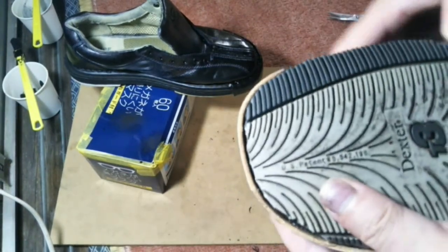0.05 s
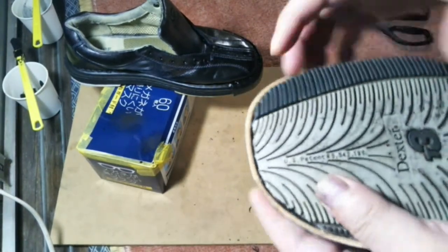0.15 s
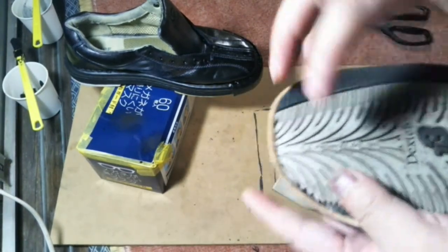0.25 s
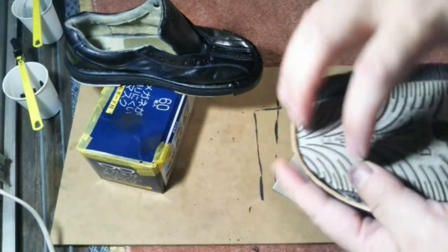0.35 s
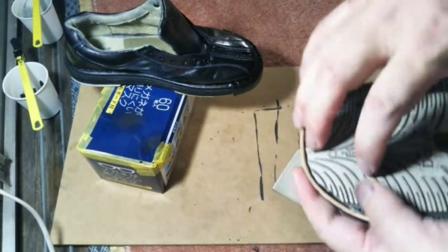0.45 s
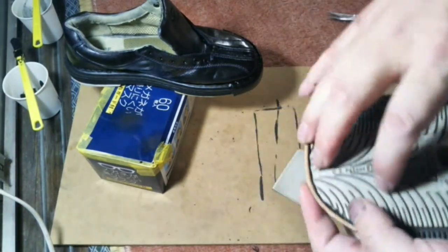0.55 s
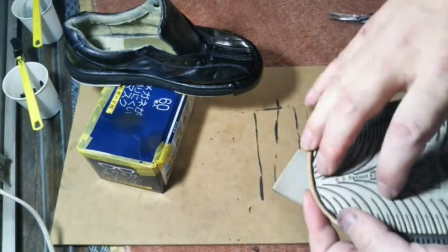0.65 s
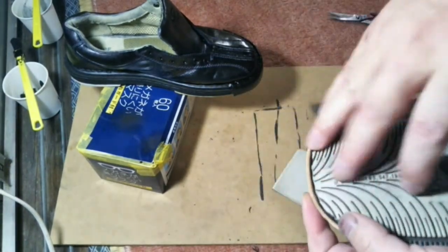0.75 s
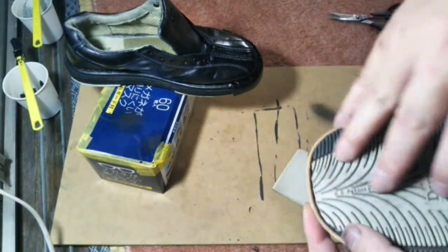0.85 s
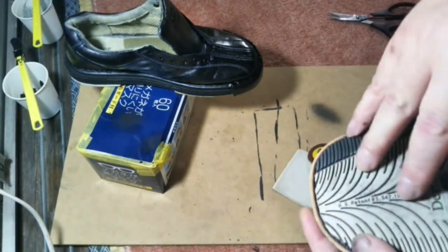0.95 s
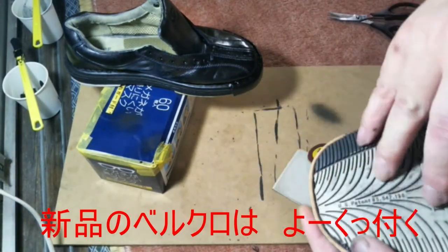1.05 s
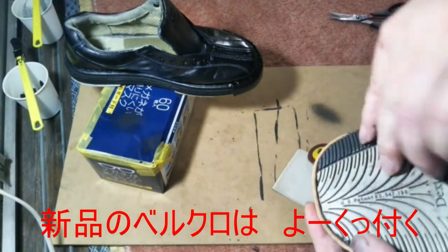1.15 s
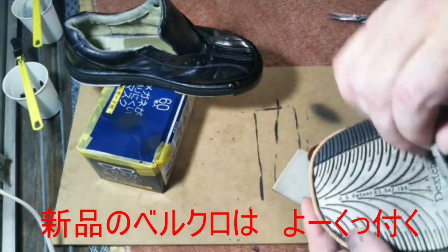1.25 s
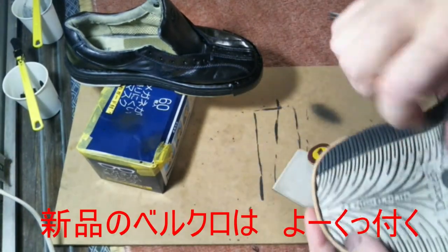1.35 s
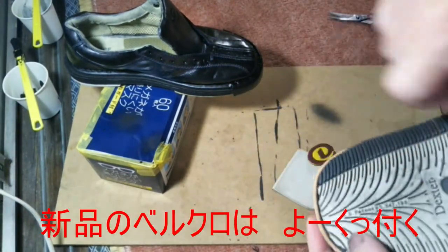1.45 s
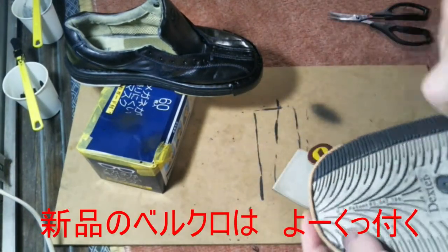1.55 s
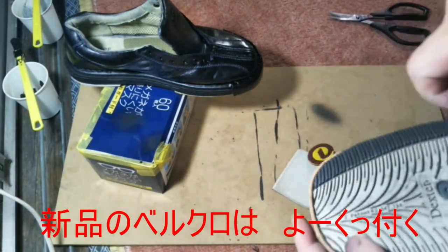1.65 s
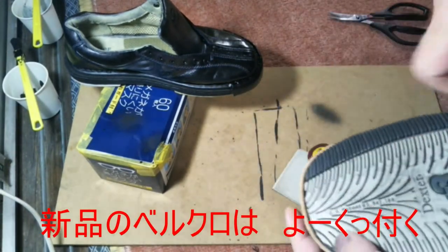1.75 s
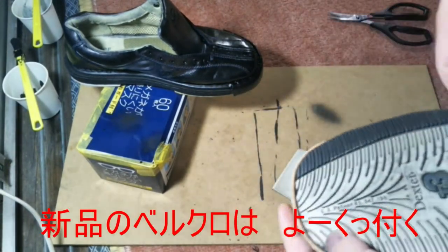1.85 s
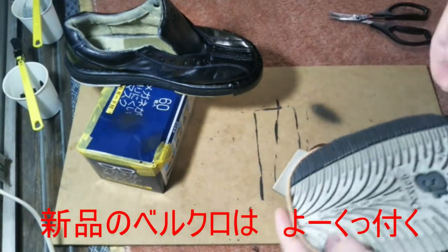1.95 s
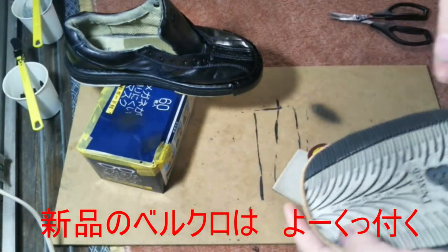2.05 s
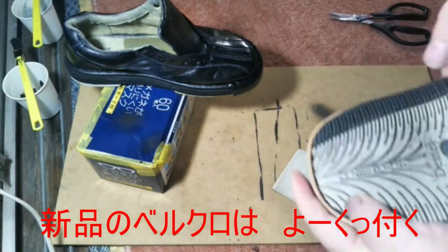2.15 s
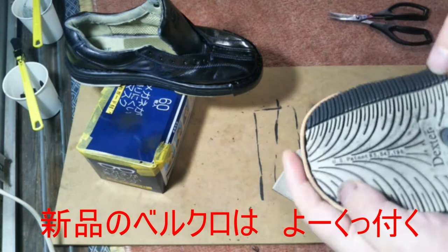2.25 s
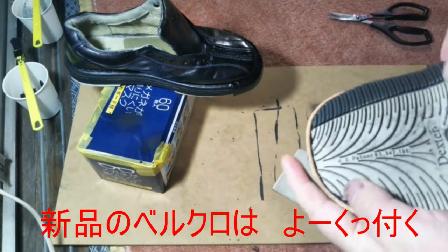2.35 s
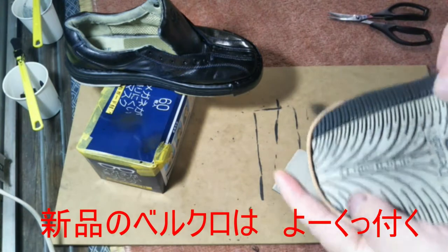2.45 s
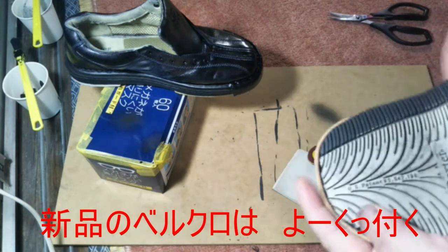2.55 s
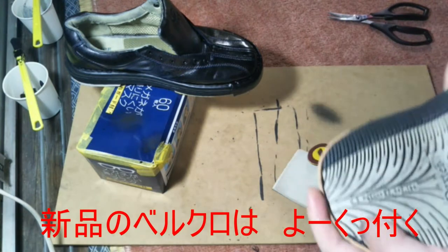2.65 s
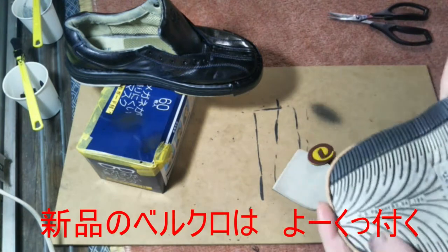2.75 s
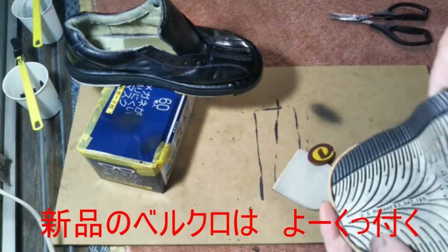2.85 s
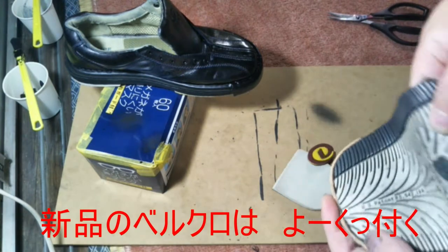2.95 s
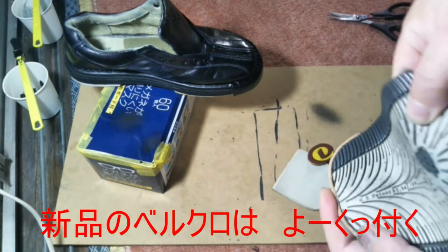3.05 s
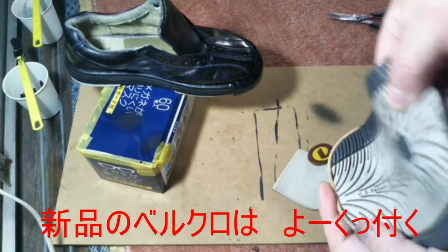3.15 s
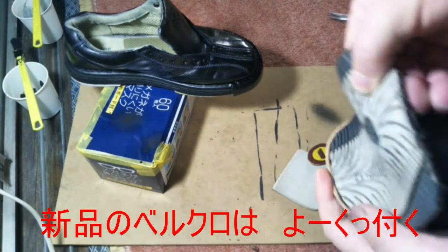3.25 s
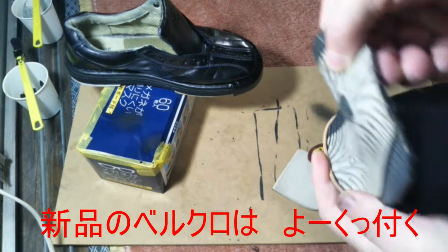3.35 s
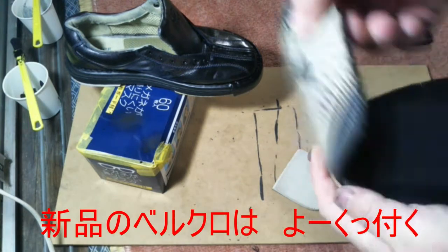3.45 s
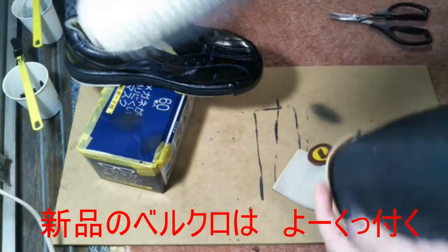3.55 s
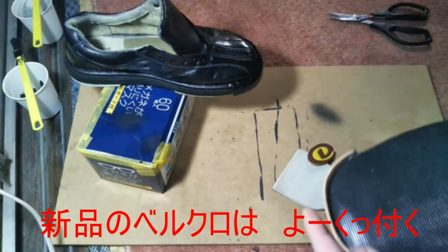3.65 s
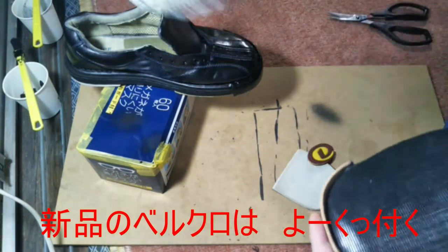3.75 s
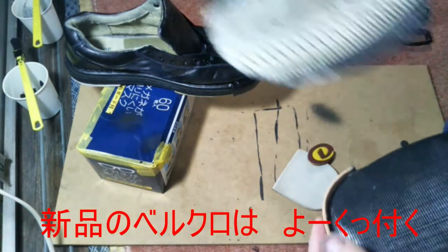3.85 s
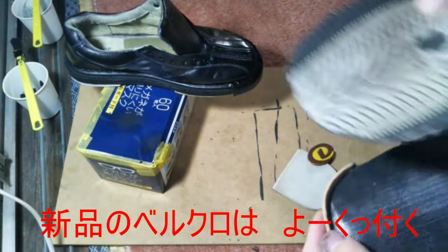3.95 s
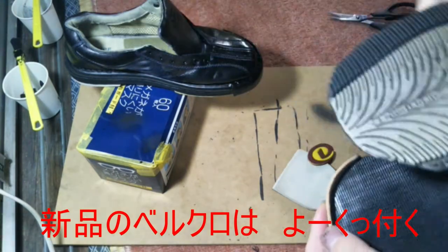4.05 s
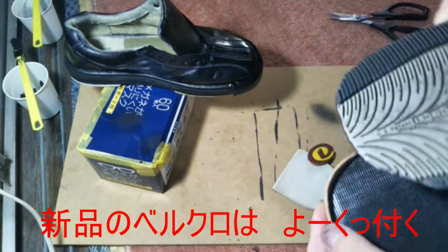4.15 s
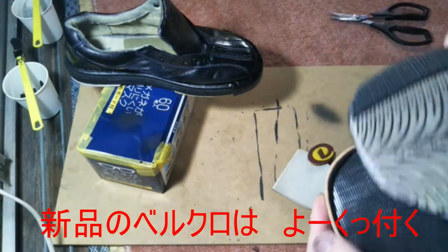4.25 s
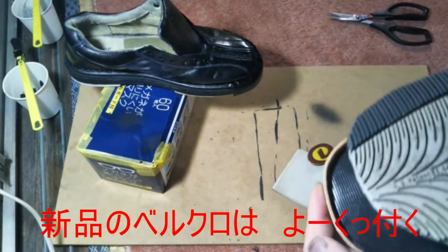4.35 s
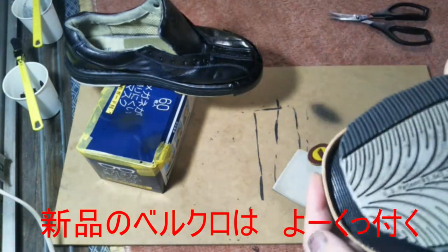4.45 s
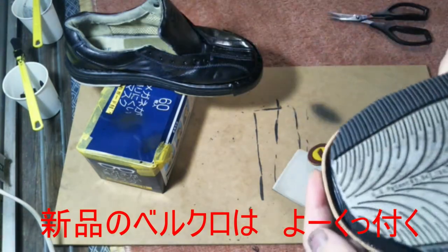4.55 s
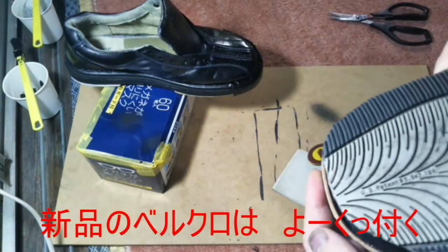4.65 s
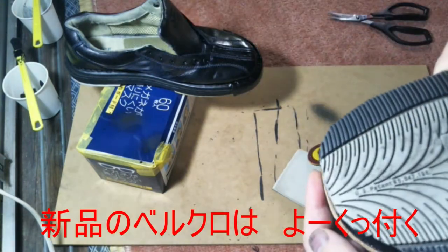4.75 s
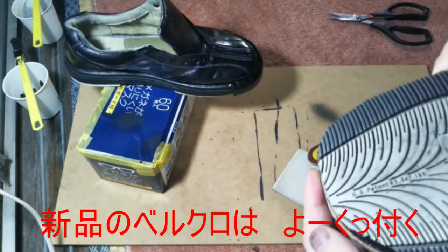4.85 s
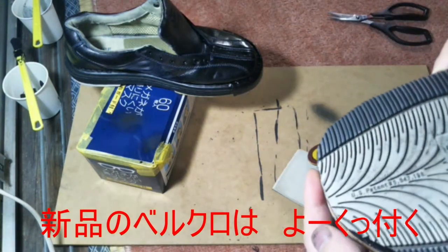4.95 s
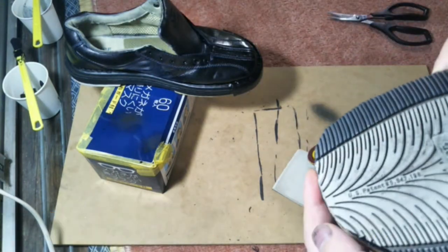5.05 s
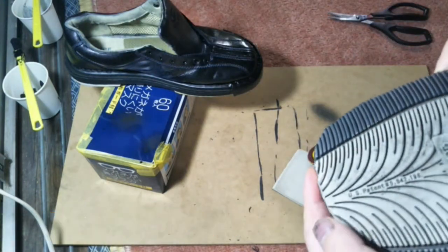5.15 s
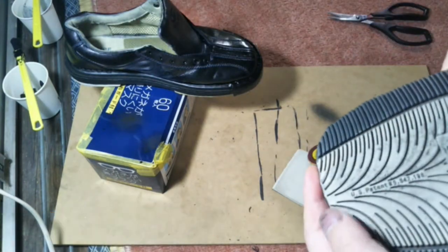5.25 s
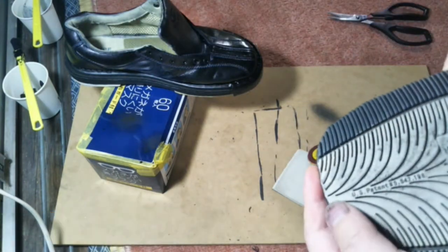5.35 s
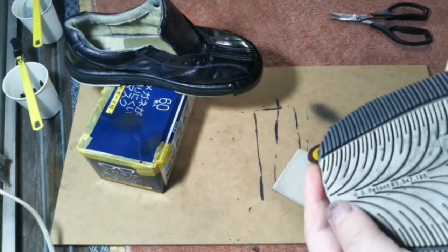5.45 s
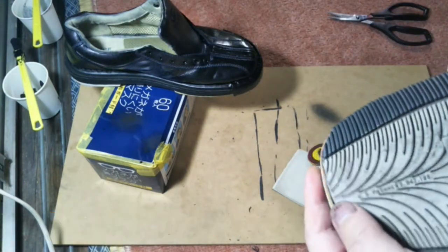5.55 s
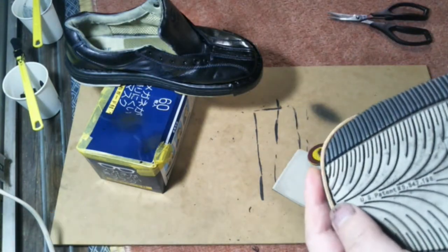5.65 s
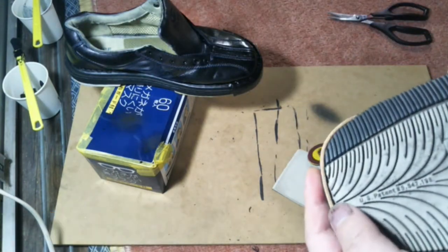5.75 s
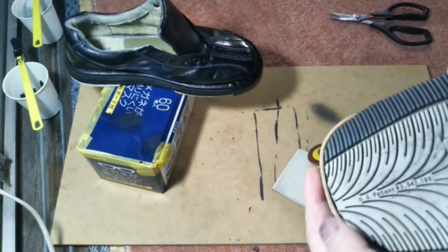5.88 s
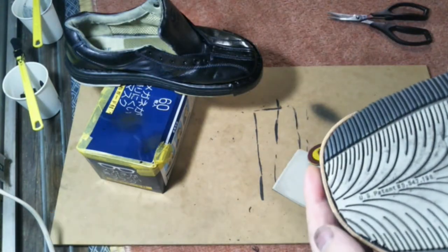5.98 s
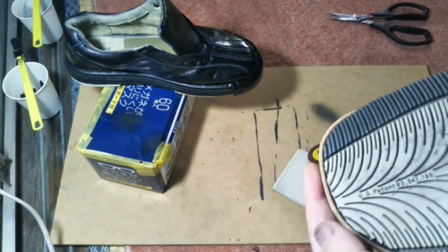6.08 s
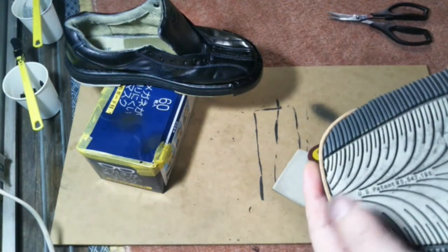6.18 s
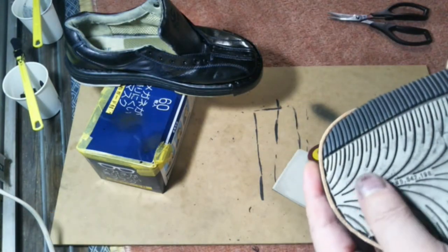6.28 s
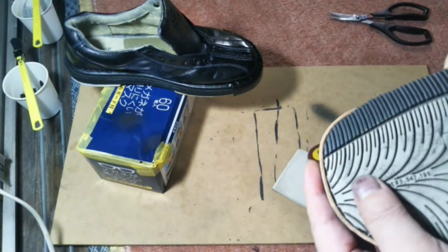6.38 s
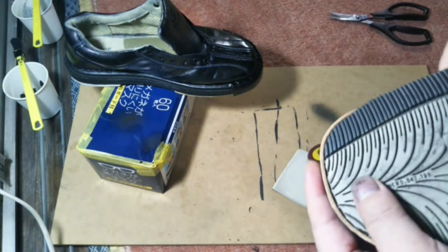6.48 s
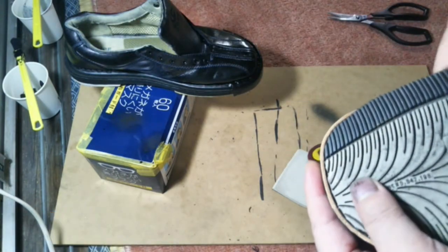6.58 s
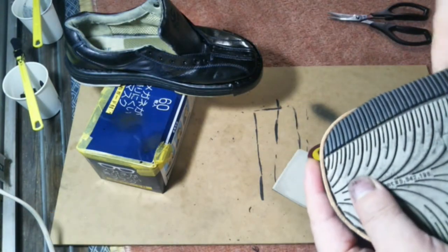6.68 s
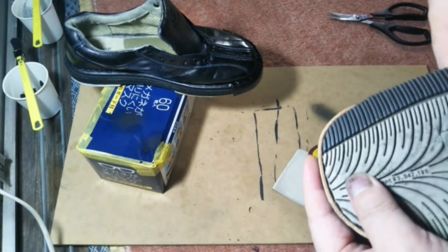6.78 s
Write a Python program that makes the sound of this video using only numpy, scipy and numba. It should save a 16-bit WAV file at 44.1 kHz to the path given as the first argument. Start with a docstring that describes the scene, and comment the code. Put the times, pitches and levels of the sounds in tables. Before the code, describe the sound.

Hook-and-loop fastener rips apart up close in long pulls and stuttering tugs, with soft finger rubs and a faint distant cricket.

```python
"""Hook-and-loop tape rips, stutters, then rips free as a replaceable sole is peeled off a shoe.
Every hook that lets go is a click that rings the rubber sole and the stiff backing, close over a workbench.
Fingers rub and tap on the shoe, and the tip of the sole scrapes as it is pressed back on.
Far off, behind the hum and hiss of a quiet room, a cricket chirps in runs of wing strokes."""
import sys
import numpy as np
from scipy import signal
from scipy.fft import rfft, irfft
from scipy.io import wavfile
from numba import njit

SR = 44100
rng = np.random.default_rng(int(sys.argv[2]) if len(sys.argv) > 2 else 0)


def output_pcm(signal):
    """Save a mono or channel-first signal as 16-bit PCM at the path in sys.argv[1].

    Samples are clipped to [-1, 1] before scaling.
    """
    pcm = np.clip(np.atleast_2d(signal).T, -1, 1) * 32767
    wavfile.write(sys.argv[1], SR, np.round(pcm).astype(np.int16))


N = 300762
TIME = np.arange(N) / SR


def from_db(db):
    return 10 ** (np.asarray(db) / 20)


def rms_one(x):
    return x / np.sqrt(np.mean(x ** 2) + 1e-20)


def energy_one(x):
    return x / np.sqrt(np.sum(x ** 2) + 1e-20)


def add(out, s, sound):
    """Mix a short sound in at time s."""
    start = max(round(s * SR), 0)
    out[..., start:start + sound.shape[-1]] += sound[..., :N - start]


def drift(rate):
    """A random wander of rms 1, with `rate` turning points a second."""
    knots = rng.standard_normal(8000)
    return rms_one(np.interp(TIME * rate, np.arange(len(knots)), knots))


def butter(x, hz, kind, order=2):
    return signal.sosfilt(signal.butter(order, hz, kind, fs=SR, output="sos"), x + 1e-18)


def convolve(x, response):
    return signal.fftconvolve(np.atleast_2d(x), np.atleast_2d(response), axes=-1)[:, :N]


def ring_of(spectrum, size=4096):
    """Minimum-phase ring of a tone colour, energy 1; its skirts fall 60 dB an octave."""
    hz, db = np.transpose(spectrum)
    octaves = np.log2(np.maximum(np.fft.rfftfreq(size, 1 / SR), 1))
    outside = np.abs(octaves - np.clip(octaves, np.log2(hz[0]), np.log2(hz[-1])))
    shape_db = np.maximum(np.interp(octaves, np.log2(hz), db) - 60 * outside, -70)
    cepstrum = irfft(np.log(from_db(shape_db)))
    cepstrum[1:size // 2] *= 2
    cepstrum[size // 2 + 1:] = 0
    return energy_one(irfft(np.exp(rfft(cepstrum))))


@njit
def resonance(x, hz, width_hz):
    """Two-pole resonance whose centre can move; it keeps the power of a white input."""
    angle = 2 * np.pi * hz / SR
    radius = np.exp(-np.pi * width_hz / SR)
    gain = np.sqrt((1 - radius ** 2) / 2)
    y = np.zeros(len(x))
    for i in range(2, len(x)):
        feedback = 2 * radius * np.cos(angle[i]) * y[i - 1] - radius ** 2 * y[i - 2]
        y[i] = gain * (x[i] - x[i - 2]) + feedback
    return y


def two_ports(mid, side):
    """Close microphone ports hear the same low sound and differ only in the treble."""
    return mid + from_db(-4.8) * butter(side, 6600, "high", order=8) * [[1], [-1]]


def background():
    """Steady room rumble, a faint mains hum, microphone hiss and the blur of distant crickets."""
    # colours of the room tone and the hiss: f/Hz, level/dB
    rumble_colour = [(12, -48.5), (20, -17), (55, 4.5), (113, -2.5), (162, -5.5), (219, -7.5), (415, -3),
                     (548, -9.5), (637, -9), (709, -12.5), (936, -13.5), (1130, -16.5), (1560, -12.5),
                     (2300, -17), (3300, -19.5), (4290, -55), (7260, -120)]
    hiss_colour = [(3000, -9), (4300, -9), (5000, -14.5), (5800, -25), (6600, -16.5), (8200, -12.5),
                   (11500, -8.5), (14000, -4)]
    white = rng.standard_normal((4, N))
    rumble = from_db(-62.5) * convolve(white[0], ring_of(rumble_colour))
    mid, side = convolve(white[1:3], ring_of(hiss_colour))
    hiss = from_db(-70) * two_ports(mid, from_db(-0.5) * side)
    chorus = from_db(-76) * rms_one(butter(white[3], [3630, 3980], "band")) * from_db(0.85 * drift(5))
    hum = from_db(-68) * np.sin(2 * np.pi * 119.5 * TIME) * (1 + .3 * drift(5.4))
    return rumble + hiss + chorus + hum


def crackle(gains, per_s, size_db, clump_db, clump_rate):
    """Tiny releases shared by a low, a mid and a high layer; more pull makes them denser and more even."""
    pull = np.clip(np.hypot(gains[1], gains[2]) / from_db(-26.5), .15, 2)
    chance = np.clip(per_s * pull ** 0.68 / SR, 0, 1)
    released = rng.random(N) < chance
    sizes = rms_one(from_db(size_db * np.minimum(rng.exponential(1, (3, N)), 3)))
    # whole rows load up and let go together
    depth = np.log(from_db(clump_db)) / (.7 + pull)
    clumps = np.exp(depth * np.clip(drift(clump_rate), -3, 1.5) - depth ** 2)
    return gains * released * sizes * clumps / np.sqrt(chance) * rng.choice([-1, 1], (3, N))


def rubs():
    """Skin slides on rubber and fabric: fine friction grain that swells and fades in a rounded arch."""
    # finger slides: t/s, length/s, dull rub/dB, rasp/dB, hiss/dB
    slides = [(0.0, .12, -65, -62, -68.5), (0.233, 0.16, -59, -60.5, -62), (0.388, 0.06, -54, -65, -71),
              (0.667, 0.045, -47, -59.5, -52), (0.748, 0.076, -56, -66, -58),
              (2.078, .05, -51.5, -56, -59.5), (2.649, 0.1, -52, -58, -57.5), (3.56, .22, -67, -67, -65),
              (3.993, 0.094, -74, -65, -73), (4.196, .06, -82, -64, -63.5), (5.57, 0.071, -58.5, -58, -67),
              (6.63, .18, -66, -76, -71.5)]
    peak_share, roundness = 0.54, 0.54
    gains = np.zeros((3, N))
    for s, length, *levels_db in slides:
        progress = TIME[:round(length * SR)] / length
        arch = np.sin(np.interp(progress, [0, peak_share, 1], [0, np.pi / 2, np.pi]))
        add(gains, s, from_db(levels_db)[:, None] * np.abs(arch) ** roundness)
    return from_db(-0.5) * crackle(gains, per_s=33000, size_db=-0.5, clump_db=2.5, clump_rate=110)


def handling(force):
    """Touches on rubber that the finger damps as it lands: a dull knock, a tick and a hiss of skin."""
    # colours of the knock and the tick: f/Hz, level/dB
    knock = [(90, -7), (220, -7.5), (420, -1), (520, -7), (700, 1), (900, -11), (1400, -21.5)]
    tick = [(1000, -8), (1700, -2), (2700, -3), (3400, -10), (4300, -8), (5200, -41)]
    skin = fizz(butter(force[2], 4800, "high", order=4))
    return convolve(force[0], ring_of(knock)) + convolve(force[1], ring_of(tick)) + skin


def fizz(force):
    """The hooks' own bright ticks come from ever new spots, so their close reflection keeps jumping."""
    # colour of the hooks: f/Hz, level/dB
    hook_colour = [(3290, -32), (5600, -11), (5780, -18.5), (6660, -5), (7410, -3), (11000, -6),
                   (12300, -4), (14000, 3), (14500, -11)]
    mean_lag_s, spread_s, jumps_per_s = .00055, .0002, 35
    spot = np.cumsum(rng.random(N) < jumps_per_s / SR)
    lag_s = np.abs(mean_lag_s + spread_s * rng.standard_normal(N)[spot])
    echo = from_db(-3) * np.interp(TIME - lag_s, TIME, force)
    ring = ring_of(hook_colour)
    return two_ports(convolve(force + echo, ring), convolve(force * rng.choice([-1, 1], N), ring))


def burst(levels_db, scatter_s, scatter_db, size=600):
    """One sharp click trailed by a quick scatter, in three layers; levels are rms over 4 ms."""
    decay = np.exp(-np.arange(size) / SR / scatter_s)
    trail = rng.standard_normal((3, size)) * rng.standard_normal(size) * decay
    trail = from_db(scatter_db) * np.array([energy_one(row) for row in trail])
    trail[:, 0] = 1
    return from_db(levels_db)[:, None] * np.array([energy_one(row) for row in trail]) * np.sqrt(.004 * SR)


def taps():
    """Fingers knock on the shoe; the longer the contact, the softer its attack."""
    # finger contacts: t/s, knock/dB, tick/dB, fizz/dB, contact time/s
    contacts = [(0.128, -50.5, -72, -74, .004), (0.218, -48, -72, -73, .004), (0.288, -52, -54, -54, .006),
                (0.512, -43, -53, -60.5, 0.0051), (1.650, -40, -44.5, -55.5, 0.016),
                (1.779, -43, -69, -72, 0.0046), (1.884, -33.5, -42, -43.5, 0.0012),
                (1.9591, -44, -50, -54.5, 0.0039), (2.333, -38.5, -50, -49, .006),
                (3.654, -57, -56.5, -55.5, 0.0035), (5.6, -54, -47, -59, 0.00081),
                (5.627, -58, -59, -66, 0.0033), (5.96, -75, -57.5, -63, 0.0012)]
    firm_contact_s = .001
    force = np.zeros((3, N))
    for s, *levels_db, contact_s in contacts:
        softness_db = 10 * np.log10(contact_s / firm_contact_s)
        add(force, s, burst(levels_db, scatter_s=contact_s, scatter_db=softness_db, size=1200))
    return force


def strays(per_s=130, size_db=7.5, fizz_db=-1):
    """Lone hooks tick under the fingers while the grip shifts; they are too light to move the sole."""
    # shifts of grip: start/s, end/s, level/dB
    regrips = [(0.224, 0.82, -73.5), (1.38, 2.004, -71)]
    level = sum(from_db(db) * ((TIME > start) & (TIME < end)) for start, end, db in regrips)
    sizes = rms_one(from_db(size_db * np.minimum(rng.exponential(1, N), 2.5)))
    clicks = level * (rng.random(N) < per_s / SR) * sizes * np.sqrt(SR / per_s)
    return np.array([np.zeros(N), clicks, from_db(fizz_db) * clicks])


def jolts():
    """The whole shoe bounces in the hand with a low, dying thud."""
    # bounces: t/s, level/dB, f/Hz, t60/s
    bounces = [(0.407, -48, 65.6, .13), (1.649, -35.5, 210, 0.1), (1.652, -46.5, 75, .1),
               (2.344, -41, 72, 0.1), (3.211, -44, 60, .16), (3.485, -35.5, 58, .16)]
    out, t = np.zeros(N), TIME[:SR // 3]
    for s, db, hz, t60 in bounces:
        add(out, s, from_db(db - 60 * t / t60) * np.sin(2 * np.pi * hz * t))
    return out


def snaps():
    """Tufts of hooks tear out at once: bright ones mostly fizz, dull ones shake the sole."""
    # tufts giving way: t/s, backing level/dB, fizz over backing/dB
    tufts = [(0.472, -53, 0), (0.766, -54.5, 14.5), (0.8257, -55, 9), (0.8312, -47, 11.5), (0.914, -33, 2),
             (0.9296, -41, 9), (0.9392, -38, 6), (0.964, -32, -5), (0.9844, -31, -2), (1.3683, -52, 5),
             (1.3768, -53, 10), (2.169, -46, -2), (2.1795, -33, -11), (2.1986, -33, -7), (2.2181, -35, -9),
             (2.247, -40.5, -6), (2.2563, -40.5, 1.5), (2.2636, -33.5, -10), (2.2693, -41, 3.5),
             (2.2786, -38.5, 1.5), (2.2873, -44.5, 2), (2.316, -44.5, -1), (2.3434, -31, -10),
             (2.3527, -36, 1), (2.409, -45.5, 3), (2.4239, -34, -10), (2.432, -41, 4), (2.4425, -35.5, -2),
             (2.4581, -34, -3), (2.4831, -34, -4), (2.5013, -35, -2), (2.5373, -36.5, -18),
             (2.5717, -39.5, -2.5), (2.7437, -36, -11), (2.778, -27, -7), (3.49, -25, -5.5)]
    force = np.zeros((3, N))
    for s, db, bright_db in tufts:
        sole_db = db - 9.5 - 0.2 * bright_db
        add(force, s, burst([sole_db, db, db + bright_db], scatter_s=0.0016, scatter_db=6.5))
    return force


def sole(force):
    """The rubber sole booms, lower and broader once the last rip lifts it off the shoe."""
    # colours of the sole on the shoe and hanging free: f/Hz, level/dB
    attached_colour = [(29, -38.5), (50, -19), (139, -17.5), (214, -10), (259, -13), (414, -6), (468, -4.5),
                       (528, -9.5), (673, 1.5), (857, -11.5), (955, -12.5), (1150, -17.5), (1250, -15),
                       (1620, -37.5), (2750, -120)]
    free_colour = [(50, -11.5), (110, -12), (195, -3), (260, -9), (420, -1.5), (520, -6), (660, 2.5),
                   (850, -0.5), (1030, 1), (1300, -7.5), (1700, -34.5)]
    free = np.interp(TIME, [3, 3.2], [0, 1])
    attached_boom = convolve(force * np.sqrt(1 - free), ring_of(attached_colour))
    return attached_boom + convolve(force * np.sqrt(free), ring_of(free_colour))


def backing(force):
    """The stiff backing rasps; its bent flap rings at a pitch that moves with the peel, its edge at one."""
    # colour of the backing: f/Hz, level/dB
    colour = [(680, -44), (1150, -18.5), (1360, -11), (1520, 2.5), (1670, -7), (1830, 3), (2170, -7.5),
              (2470, -3.5), (2790, -3.5), (3280, -9), (3760, -4), (4390, -1.5), (4860, -4.5), (5800, -26),
              (7540, -31.5), (12800, -120)]
    # path of the flap's resonance: t/s, f/Hz, share of the drive/0-1
    flap_path = [(1.32, 2700, .02), (2.2, 2550, .2), (2.78, 2450, .25), (2.85, 1850, 0.1), (3.06, 1790, .1),
                 (3.089, 3900, .02), (3.17, 3600, .4), (3.24, 3320, .66), (3.45, 2950, 0.4)]
    s, hz, share = np.transpose(flap_path)
    share = np.interp(TIME, s, share)
    push = force * np.sqrt(share) + 1e-18
    bend = resonance(push, np.interp(TIME, s, hz), width_hz=460)
    edge = from_db(-2) * resonance(push, np.full(N, 4500.), width_hz=600)
    flap = butter(bend + edge, 1000, "high")
    flap = butter(flap, [5500, 6400], "bandstop")
    return convolve(force * np.sqrt(1 - share), ring_of(colour)) + flap


def cricket(roughness=.55, scatter_hz=25, sag_hz_per_s=14500):
    """Runs of evenly spaced wing strokes; each is a roughened sine that sinks in pitch."""
    # runs of strokes: t/s, stroke count, period/s, level/dB, starting f/Hz
    runs = [(0.578, 4, 0.074, -65, 4180), (1.389, 3, .048, -67, 4040), (1.557, 6, 0.065, -67.5, 4224),
            (2.66, 1, 0.056, -64, 4200), (3.715, 5, 0.068, -69, 4285), (4.09, 3, 0.058, -75.5, 4170),
            (4.29, 8, 0.073, -65.5, 4175), (4.918, 3, 0.04, -66, 4050), (5.107, 3, .044, -64, 4010),
            (5.302, 2, 0.042, -66, 4030), (5.457, 2, 0.039, -65, 3980), (5.617, 1, 0.035, -67, 4030),
            (6.609, 3, 0.067, -66.5, 4114)]
    sounding_share = 0.76
    out = np.zeros(N)
    for start, count, period, db, top_hz in runs:
        t = TIME[:round(sounding_share * period * SR)]
        swell = rms_one(np.abs(np.sin(np.pi * (t / t[-1]) ** 0.6)) ** .5)
        for k, detune in enumerate(rng.standard_normal(round(count))):
            hz = top_hz + scatter_hz * detune - sag_hz_per_s * t
            tone = np.sqrt(2) * np.sin(2 * np.pi * np.cumsum(hz) / SR)
            add(out, start + k * period, from_db(db) * swell * tone)
    return out * (1 + roughness * drift(220))


def rips():
    """Two long pulls tear through the hooks; the sole booms with the pull, less once off its seat."""
    # course of each pull: t/s, backing rasp/dB, fizz over rasp/dB
    first_rip = [(0.825, -56.5, 10.5), (0.883, -47, 10.5), (0.893, -36, 3.5), (0.953, -37.5, 2),
                 (0.969, -35, 4), (0.997, -39.5, 2), (1.199, -27, 5.5), (1.249, -32, 7.5), (1.285, -28, 4),
                 (1.311, -31, 5), (1.36, -57.5, 3)]
    last_rip = [(2.712, -55, -1), (2.716, -52, 0), (2.788, -29.5, -6.5), (2.988, -26.5, 4), (3.06, -33, 5),
                (3.14, -32.5, 6), (3.19, -24.5, 5), (3.22, -26.5, -1.5), (3.272, -33, -7),
                (3.436, -27, -2.5), (3.494, -33, 7), (3.5, -47.5, 9.5)]
    firm_pull_db, sole_follows = -32.5, 0.86
    firm_boom_db = np.interp(TIME, [1.146, 1.216], [-33, -40.5])   # the sole comes off its seat
    gains = np.zeros((3, N))
    for course in (first_rip, last_rip):
        s, rasp_db, bright_db = np.transpose(course)
        pull_db = np.interp(TIME, s, rasp_db)
        sole_db = firm_boom_db + sole_follows * (pull_db - firm_pull_db)
        fizz_db = pull_db + np.interp(TIME, s, bright_db)
        peeling = (TIME >= s[0]) & (TIME <= s[-1])
        gains += peeling * from_db([sole_db, pull_db, fizz_db])
    return crackle(gains, per_s=2700, size_db=3.4, clump_db=3, clump_rate=240)


def tugs(attack_s=0.00304, sag_db_per_s=157, release_db_per_s=900):
    """The tape stutters: each short tug bites at once, slackens while the hooks give, and stops."""
    # short pulls: t/s, length/s, backing level/dB
    pulls = [(2.1168, 0.065, -33), (2.254, 0.047, -44.5), (2.34, 0.01, -37.5), (2.415, 0.058, -44),
             (2.486, 0.0266, -37.5), (2.524, 0.11, -38.5), (2.719, .02, -49)]
    envelope, t = np.zeros(N), TIME[:SR // 3]
    for s, length, db in pulls:
        fall_db = sag_db_per_s * t + release_db_per_s * np.maximum(t - length, 0)
        add(envelope, s, np.minimum(t / attack_s, 1) * from_db(db - fall_db))
    gains = envelope * from_db([[-1.5], [0], [-2]])   # sole, backing, fizz
    return crackle(gains, per_s=5000, size_db=3.5, clump_db=3, clump_rate=300)


def scrapes(per_s=2000):
    """The sole's stiff tip is pressed back on: stick-slip clicks build until the rubber lets go."""
    # presses: end/s, build-up/s, level/dB
    presses = [(4.052, .05, -66), (5.586, 0.063, -54.5), (5.598, 0.007, -40)]
    # colour of the tip: f/Hz, level/dB
    tip_colour = [(1250, -33), (1550, 1), (2100, -4), (2750, 3), (3150, -12), (3900, -32)]
    force, t = np.zeros(N), TIME[:SR // 5]
    for end, length, db in presses:
        slips = (rng.random(len(t)) < per_s / SR) * rng.standard_normal(len(t)) * np.sqrt(SR / per_s)
        build = np.exp(2 * (t - t[-1]) / length)
        add(force, end - t[-1], from_db(db) * build * slips)
    return convolve(force, ring_of(tip_colour))


def room(x, t60, wet_db, dull_hz):
    """Direct sound and a dense, duller tail from the bench and walls."""
    t = TIME[:SR // 2]
    tail = rng.standard_normal(len(t)) * from_db(-60 * t / t60) * (t > .003)
    tail = energy_one(butter(tail, dull_hz, "low", order=1))
    return x + from_db(wet_db) * convolve(x, tail)


def scene():
    """Rips, tugs and snaps ring the shoe close by, amid finger noises; cricket and room lie behind."""
    peeling = rips() + tugs()
    touches = rubs() + taps() + strays()
    on_sole, on_backing, on_hooks = peeling + snaps()
    shoe = sole(on_sole) + backing(on_backing) + fizz(on_hooks)
    near = room(shoe + handling(touches) + scrapes() + jolts(), t60=.13, wet_db=-16.5, dull_hz=15000)
    # about half of the cricket's sound arrives by reflection
    far = from_db(-1) * room(cricket(), t60=0.19, wet_db=-1, dull_hz=7960)
    return near + far + background()


def record(dry):
    """The deepest bass is rolled off and the top is cut steeply."""
    thinned = butter(dry, 42, "high", order=4)
    return signal.sosfilt(signal.ellip(14, .2, 80, 14450, fs=SR, output="sos"), thinned)


dry = scene()
out = record(dry)
output_pcm(out)
```